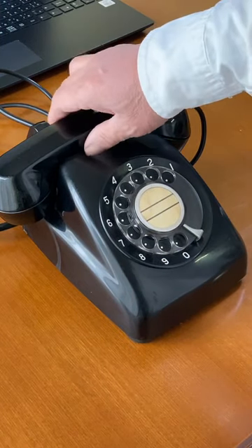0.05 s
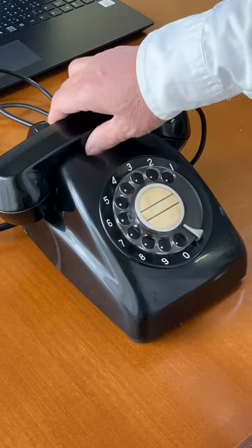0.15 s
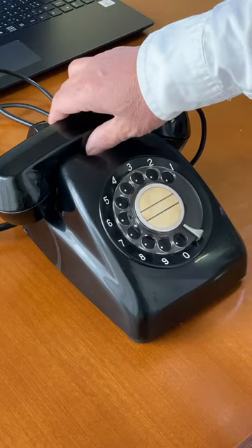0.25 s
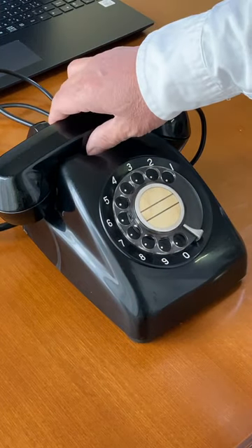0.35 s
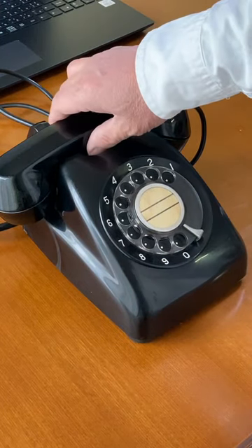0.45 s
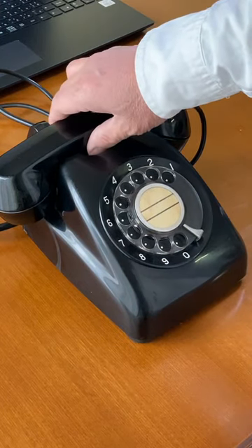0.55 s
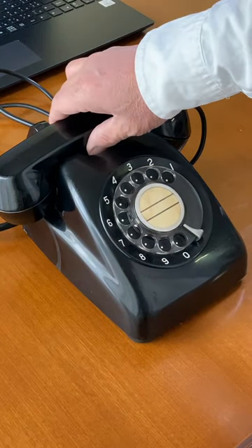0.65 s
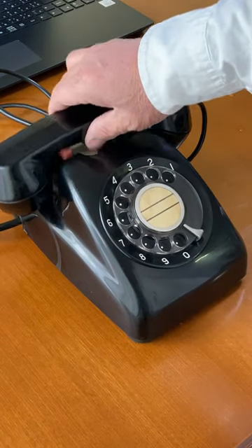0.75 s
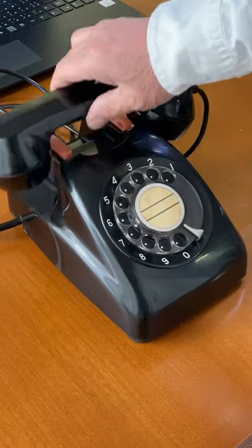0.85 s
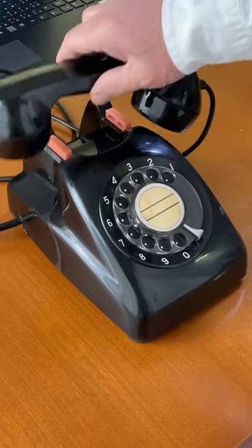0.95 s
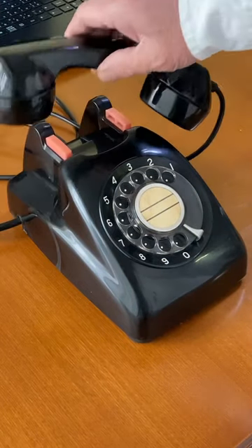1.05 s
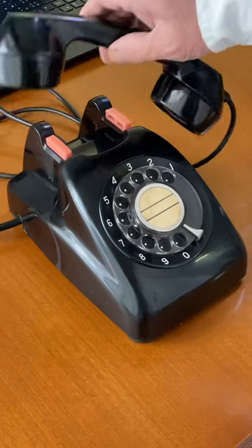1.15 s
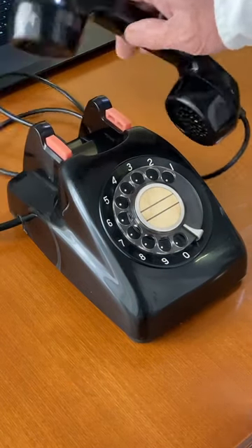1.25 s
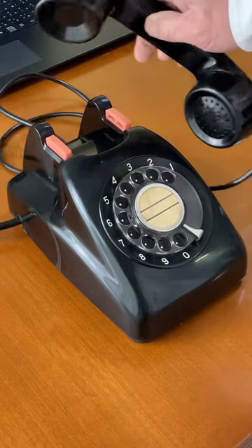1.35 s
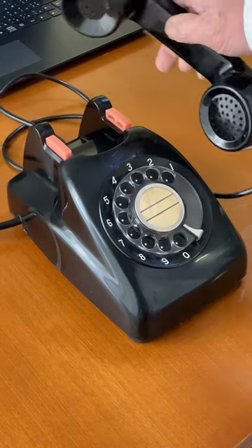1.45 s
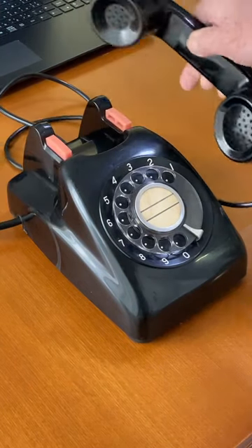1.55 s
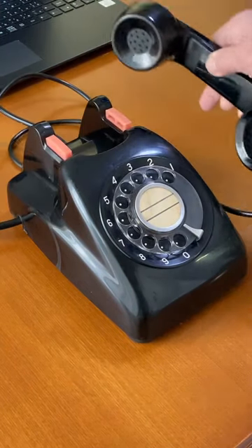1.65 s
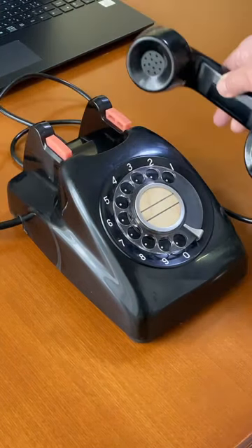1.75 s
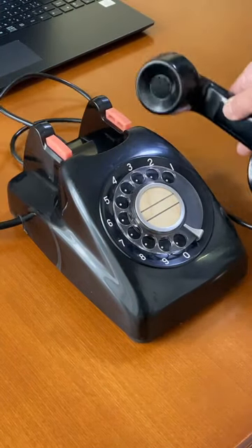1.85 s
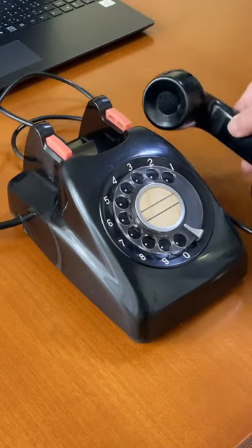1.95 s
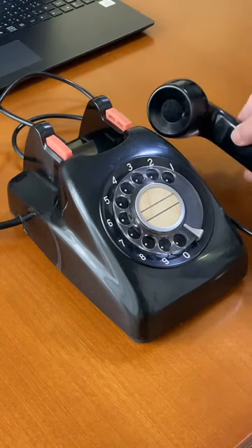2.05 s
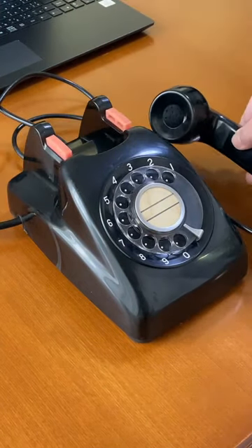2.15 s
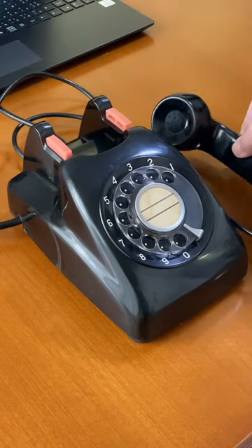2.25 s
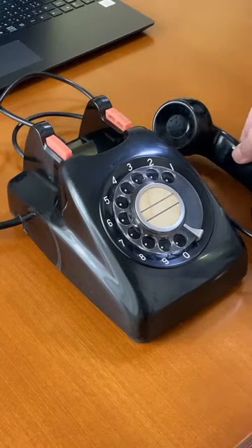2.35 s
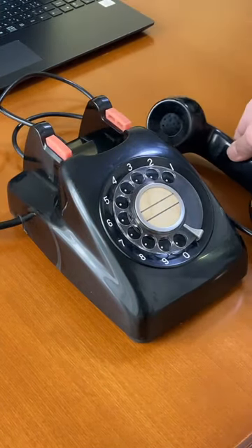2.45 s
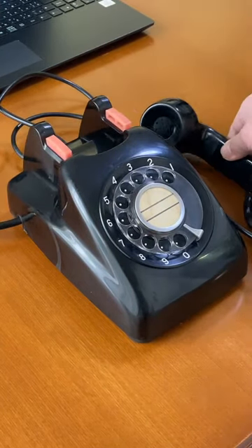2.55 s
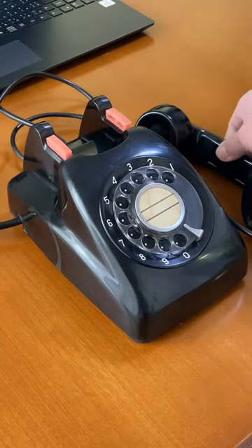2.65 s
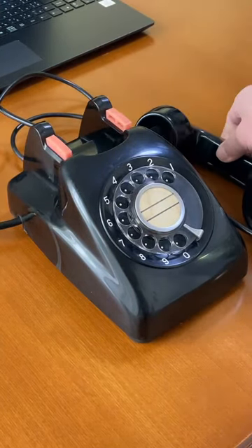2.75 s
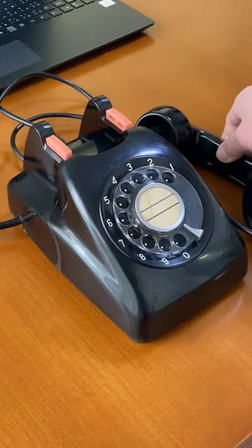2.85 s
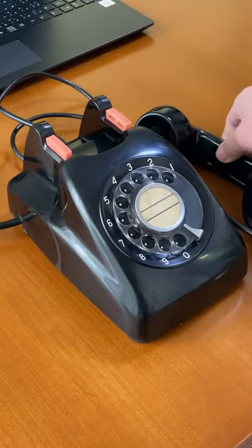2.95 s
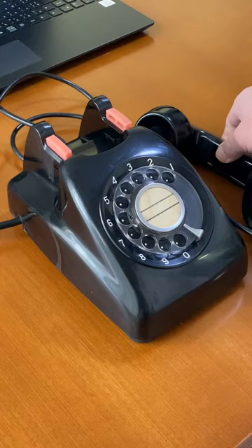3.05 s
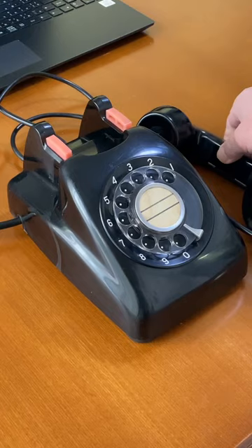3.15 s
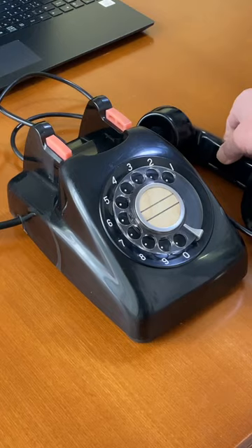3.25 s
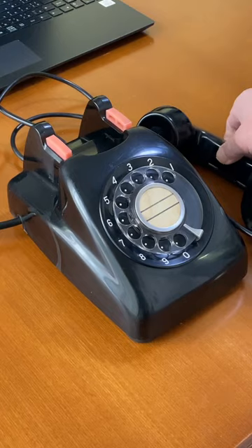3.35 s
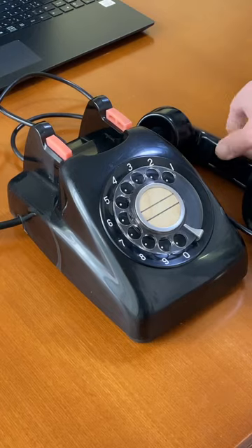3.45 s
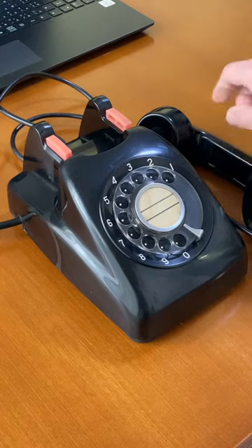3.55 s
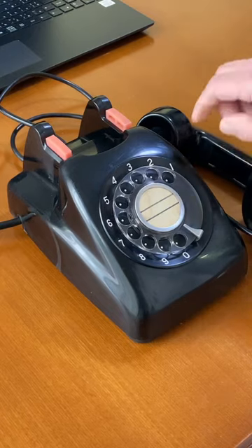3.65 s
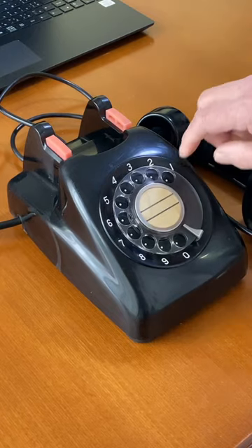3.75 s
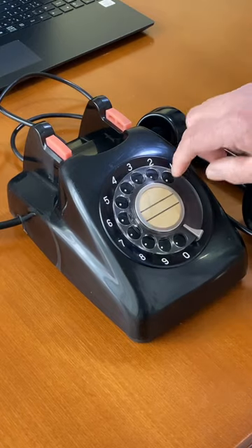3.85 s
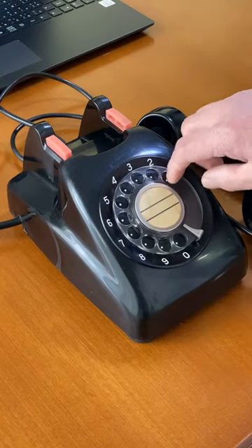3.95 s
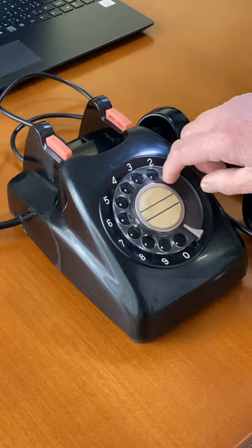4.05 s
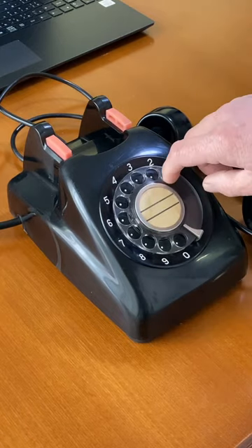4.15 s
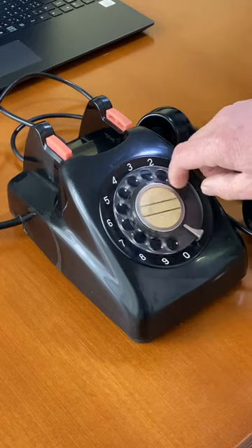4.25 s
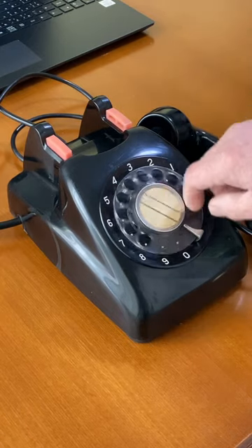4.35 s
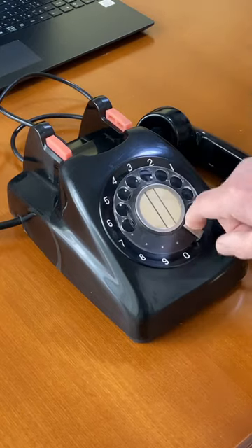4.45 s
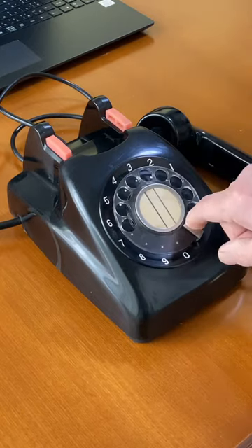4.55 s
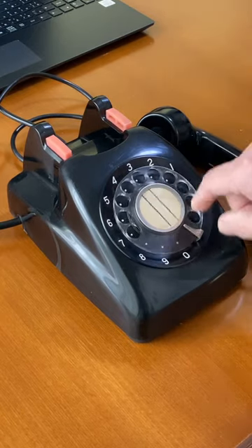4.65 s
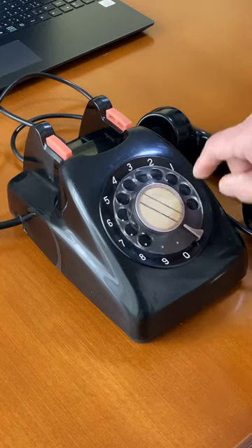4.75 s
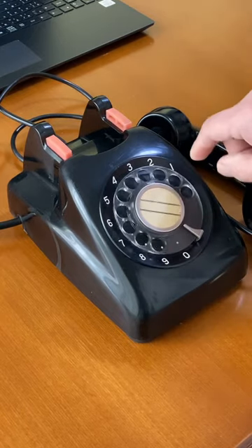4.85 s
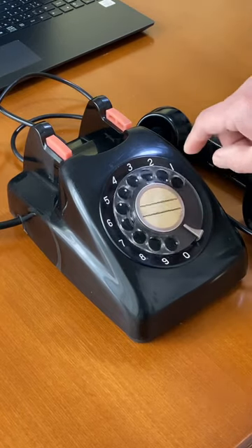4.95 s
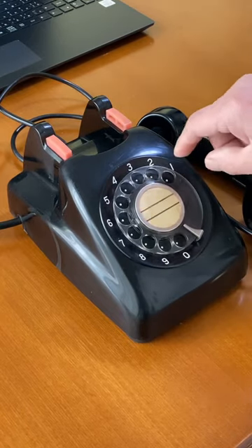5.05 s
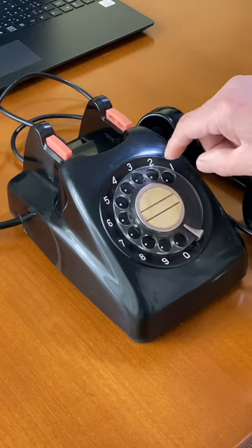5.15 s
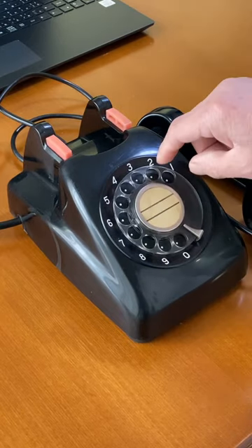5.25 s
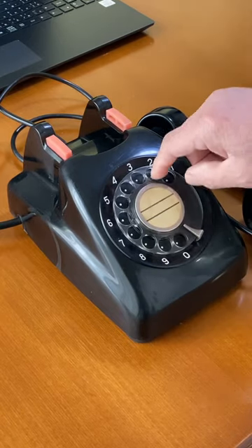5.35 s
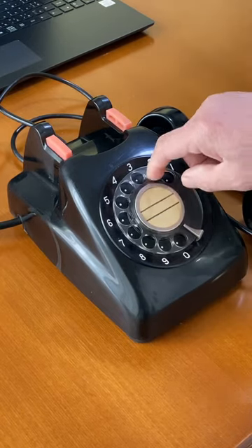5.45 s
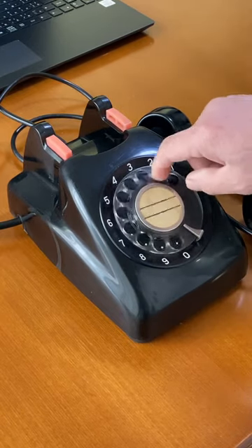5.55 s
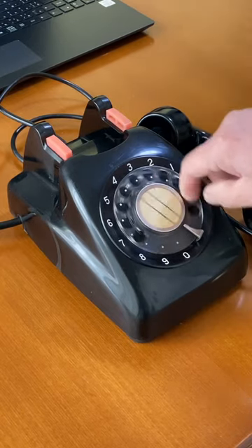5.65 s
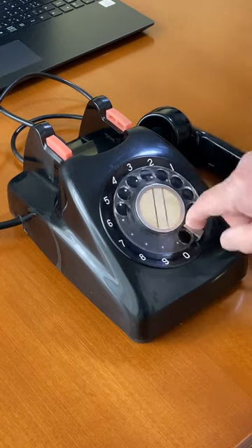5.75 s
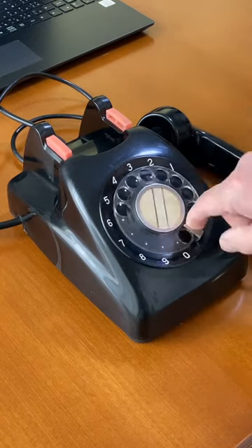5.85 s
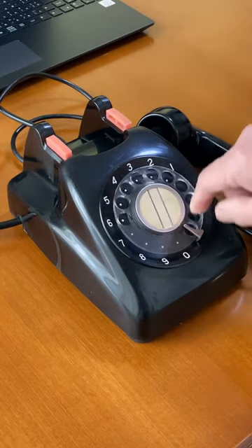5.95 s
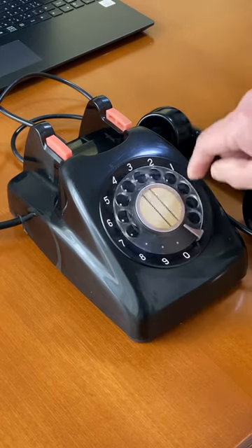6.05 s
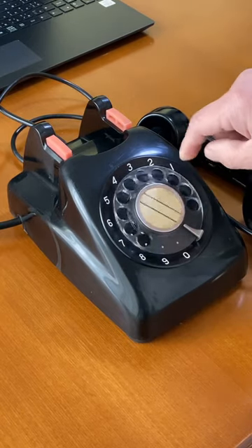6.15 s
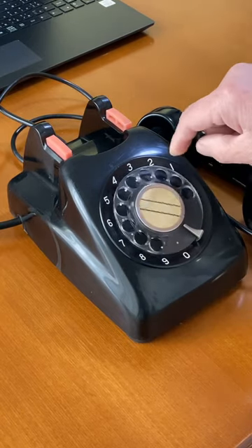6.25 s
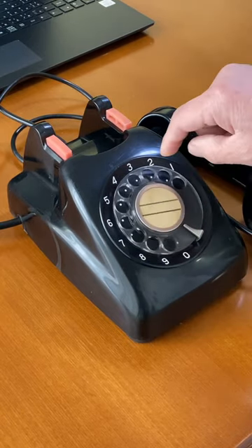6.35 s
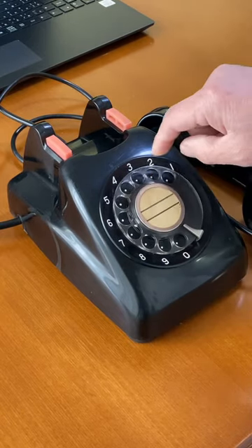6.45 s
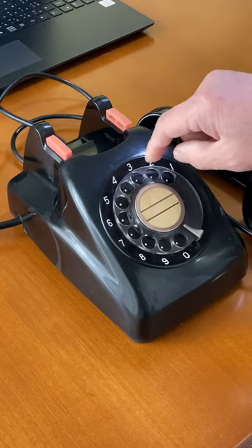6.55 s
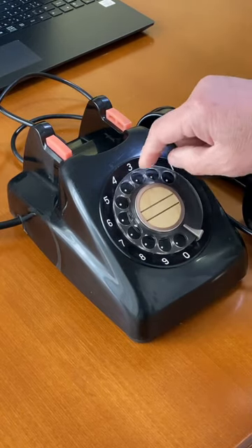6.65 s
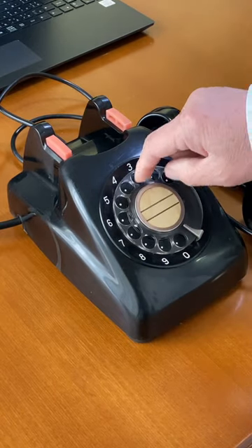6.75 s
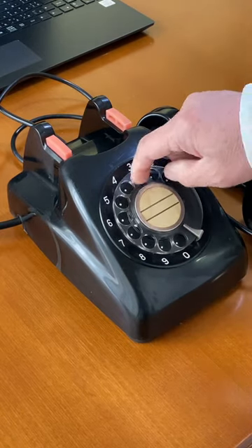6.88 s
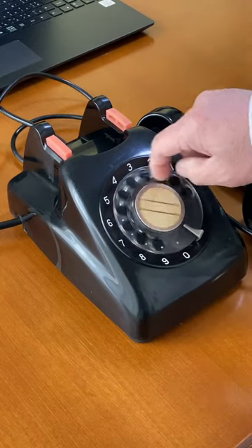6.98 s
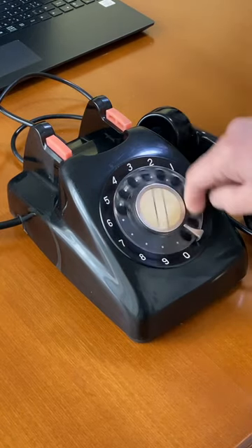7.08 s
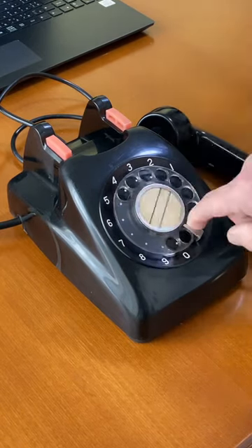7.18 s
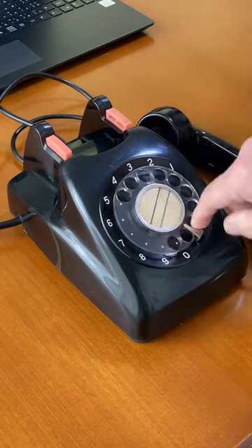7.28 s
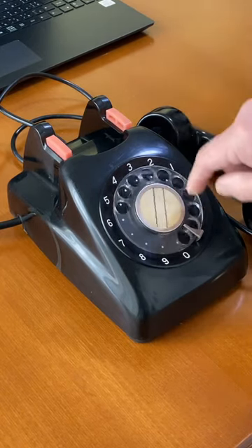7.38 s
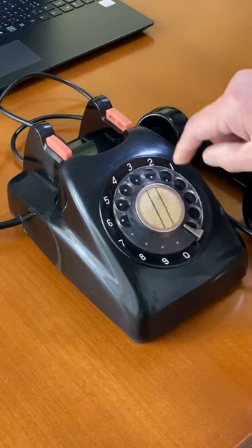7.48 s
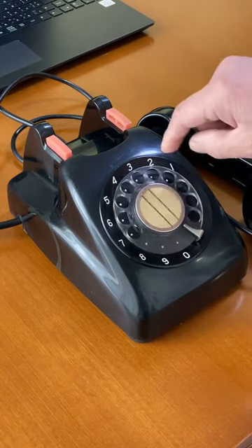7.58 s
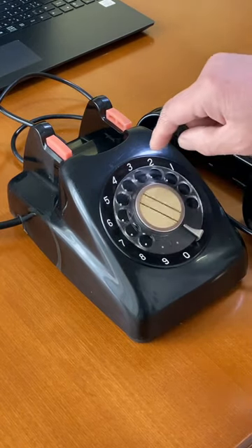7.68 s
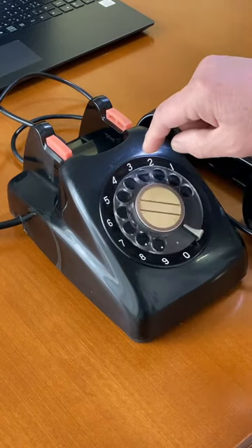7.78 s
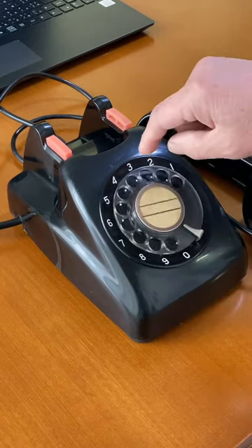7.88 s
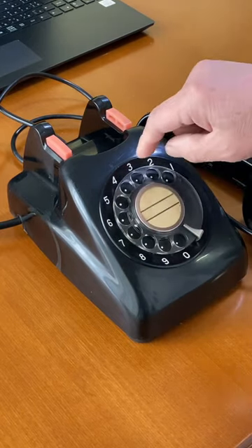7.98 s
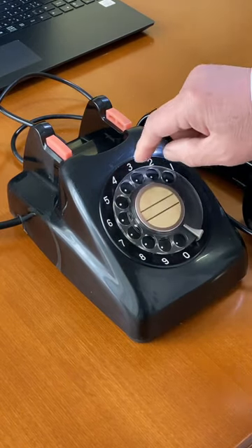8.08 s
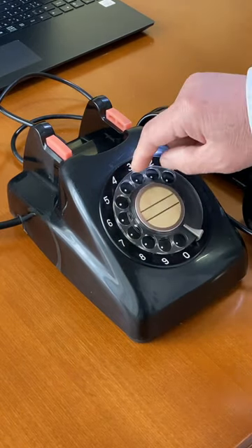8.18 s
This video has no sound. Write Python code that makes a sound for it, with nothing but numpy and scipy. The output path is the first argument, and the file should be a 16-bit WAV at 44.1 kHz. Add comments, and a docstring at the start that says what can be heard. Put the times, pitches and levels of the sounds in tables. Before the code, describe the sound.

In a quietly humming room, a telephone receiver clatters onto a desk, followed by three ratcheting dial turns with clicking, whirring returns and stop thuds.

```python
"""A small room with a humming induction motor: a plastic handset is lifted off a rotary telephone and laid
on a wooden desk, then three digits are dialled. Knocks are decaying modes of shell and desk; gears are
tooth impacts through housing resonances. Per digit the finger winds the ratchet, the governor whirrs the
wheel home past clicking contacts and a stop thuds. Heard through two closely spaced microphone ports."""
import sys
import numpy as np
from scipy import signal
from scipy.fft import rfft, irfft, next_fast_len
from scipy.io import wavfile
from scipy.ndimage import uniform_filter1d

SR = 44100
rng = np.random.default_rng(int(sys.argv[2]) if len(sys.argv) > 2 else 0)


def decibels_to_gain(level_db):
    """Convert a level in decibels to a linear amplitude gain (20 dB per decade)."""
    exponent = np.asarray(level_db, float) / 20
    return 10 ** exponent


def put_to_file(sound):
    """Save the sound as 16-bit audio at rate SR, in the file named by the first command-line argument."""
    columns = np.atleast_2d(sound).T  # one column per channel
    safe = np.clip(columns, -1, 1)
    whole_steps = np.round(safe * 32767)
    wavfile.write(sys.argv[1], SR, whole_steps.astype(np.int16))


N = 362502


def evened(x):
    """Scales to unit rms."""
    return x / np.sqrt(np.mean(x ** 2) + 1e-20)


def peaked(x):
    """Scales a short sound so that its loudest 4 ms have level 0 dB."""
    return x / np.sqrt(uniform_filter1d(x ** 2, 176).max())


def read(points, hz):
    """Interpolates a curve over log frequency."""
    point_hz, value = np.transpose(points)
    return np.interp(np.log(hz + 1), np.log(point_hz + 1), value)


def add(mix, start_s, sound):
    """Adds a sound in place, cut at the end of the mix."""
    part = mix[round(start_s * SR):][:len(sound)]
    part += sound[:len(part)]


def coloured(x, points):
    """Causal filter with the given spectrum: the phase follows from the log gain."""
    hz = abs(np.fft.fftfreq(4096, 1 / SR))
    log_gain = np.log(decibels_to_gain(np.maximum(read(points, hz), -90)))
    impulse = np.fft.ifft(np.exp(np.conj(signal.hilbert(log_gain)))).real[:2048]
    return signal.oaconvolve(x, impulse)[:len(x)]


def resonate(x, hz, width_hz):
    """One-pole complex resonance; wider means faster decay."""
    r = np.exp(-np.pi * width_hz / SR)
    return 2 * signal.lfilter([1 - r], [1, -r * np.exp(2j * np.pi * hz / SR)], x).real


def band(x, lo_hz, hi_hz):
    """Band-pass at unit rms."""
    sos = signal.butter(2, [lo_hz, hi_hz], "bandpass", fs=SR, output="sos")
    return evened(signal.sosfilt(sos, x))


def grit(per_s, spread_db):
    """Random micro-impacts of uneven size."""
    size = decibels_to_gain(spread_db * np.minimum(rng.exponential(1, N), 4))
    hits = rng.random(N) < per_s / SR
    return evened(size * hits * rng.choice([-1., 1.], N))


def ring(modes, rise_s, spread_db, near_hz, narrow_db):
    """One blow: the strike point favours modes near one pitch, the others fall off per octave."""
    hz, db, t60_s = np.transpose(modes)[:, :, None]
    t = np.arange(0, 1.2 * t60_s.max(), 1 / SR)
    weight, sign = rng.standard_normal((len(modes), 2)).T[:, :, None]
    struck_db = db + spread_db * weight - narrow_db * abs(np.log2(hz / near_hz))
    waves = np.sign(sign) * decibels_to_gain(struck_db - 60 * t / t60_s) * np.sin(2 * np.pi * hz * t)
    return peaked(waves.sum(0) * (1 - np.exp(-t / rise_s)))


# motor lines: (shaft multiple, mains multiple)
HUM_ORDERS = [(1, 0), (0, 1), (-1, 2), (2, 0), (0, 2), (3, 0), (1, 2), (0, 3), (0, 4), (0, 5)]
# their peak levels: (level [dB])
HUM_DB = [-33.5, -61, -68, -70, -56, -73, -77.5, -83, -72, -85]
SHAFT_HZ, MAINS_HZ, FIRST_DIP_S = 48.524, 49.98, .63
FAN_LINES_HZ, FAN_DB = [91.58, 311.47, 314.42], [-65, -82, -83]


def hum():
    """Shaft and mains lines stand against each other once per slip cycle, so the hum dips."""
    t = np.arange(N) / SR - FIRST_DIP_S
    out = np.zeros(N)
    for (shaft, mains), db in zip(HUM_ORDERS, HUM_DB):
        sign = 1 if mains == 0 else -1
        out += sign * decibels_to_gain(db) * np.sin(2 * np.pi * (shaft * SHAFT_HZ + mains * MAINS_HZ) * t)
    for hz, db in zip(FAN_LINES_HZ, FAN_DB):
        out += decibels_to_gain(db) * np.sin(2 * np.pi * (hz * t + rng.random()))
    return out


# room noise spectrum: (frequency [Hz], level [dB])
AIR = [(30, -10), (70, -0.5), (120, -3), (200, -9), (310, -14), (430, -28), (580, -27), (790, -31.5),
       (1200, -26.5), (4200, -33), (8000, -33.5), (14000, -32.5), (16300, -50), (17000, -79)]
# left-right correlation of the noise: (frequency [Hz], likeness [-1..1])
AIR_SAME = [(60, 1), (300, .95), (600, .2), (1000, -.35), (3200, -.55), (4300, -.1), (6000, -.7),
            (7500, .9), (9500, .55), (12500, -.3), (14500, .95)]
AIR_DB = -62.5


def air():
    """Room noise, alike in both ports in the bass; its level wavers, most in the bass."""
    frames, hz = N // 512 + 5, np.fft.rfftfreq(2048, 1 / SR)
    a, b, c, d, patches = rng.standard_normal((frames, 1025, 5)).T
    patches = evened(uniform_filter1d(uniform_filter1d(patches, 20, 0), 8, 1))
    same = np.clip(read(AIR_SAME, hz), -1, 1)[:, None]
    left = a + 1j * b
    z = np.array([left, same * left + np.sqrt(1 - same ** 2) * (c + 1j * d)])
    waver_db = 0.6 + 3.4 / (1 + (hz[:, None] / 600) ** 2)
    z *= decibels_to_gain(read(AIR, hz)[:, None] + waver_db * patches)
    return decibels_to_gain(AIR_DB) * evened(signal.istft(z, nperseg=2048, noverlap=1536)[1][:, :N])


# faint wavering tone in the fan noise: (frequency [Hz], width [Hz], level [dB])
WHINE = (578, 12, -91)


def whine():
    """Noise through a narrow resonance, applied twice."""
    hz, width_hz, db = WHINE
    once = resonate(rng.standard_normal(N), hz, width_hz)
    return decibels_to_gain(db) * evened(resonate(once, hz, width_hz))


# reverberation: (frequency [Hz], t60 [s])
ROOM = [(200, 0.54), (530, 0.33), (1390, 0.3), (3680, 0.26), (9700, 0.15)]


def room(x):
    """Sparse echoes, each band dying at its own speed; the bass reaches both ports alike."""
    taps = np.zeros((2, SR))
    at = np.arange(200, SR - 20, 20) + rng.integers(0, 20, (2, (SR - 201) // 20))
    np.put_along_axis(taps, at, rng.choice([-1., 1.], at.shape), 1)
    hz, t, z = signal.stft(taps, SR, nperseg=256)
    same = 1 / (1 + (hz[:, None] / 450) ** 2)
    z[1] = same * z[0] + np.sqrt(1 - same ** 2) * z[1]
    z *= hz[:, None] / (hz[:, None] + 300)  # furnishings soak up the low bass
    decay = decibels_to_gain(-60 * t / read(ROOM, hz)[:, None])
    tail = signal.istft(z * decay, SR, nperseg=256)[1]
    return signal.fftconvolve(x[None], tail / np.linalg.norm(tail[0]), axes=1)[:, :N]


# sound from the desk, at lead 1: (frequency [Hz], left leads by [rad])
PORT_PHASE = [(0, 0), (200, 0), (400, -.8), (750, -2), (1150, -1.7), (1700, -.3), (2300, -.4), (3200, -1.4),
              (4100, -3.0), (4700, -3.7), (6100, -2.5), (7600, -.3), (9300, 1.1), (11500, 2.6),
              (12900, 4.3), (14300, 6.2), (16500, 6.3)]
# (frequency [Hz], left over right [dB])
PORT_BALANCE = [(60, 5.5), (110, 5), (200, 3.5), (380, 4.5), (700, 1.5), (1290, -1.5), (2380, -0.5),
                (4400, 0.5), (8120, -0.5), (15000, 0)]


def ports(pair, lead):
    """Left and right differ by a phase lead and a level, both depending on frequency."""
    size = next_fast_len(N + SR)
    hz = np.fft.rfftfreq(size, 1 / SR)
    half = decibels_to_gain(read(PORT_BALANCE, hz) / 2) * np.exp(.5j * lead * read(PORT_PHASE, hz))
    return irfft(rfft(pair, size) * [half, 1 / half], size)[:, :N]


# fine friction spectrum: (frequency [Hz], level [dB])
BEARING = [(2650, -39), (4500, -9), (5640, -3), (8450, -1.5), (10300, -3), (11900, -35.5), (14600, -13),
           (16300, -20)]


def bearing(drive):
    """Fine impacts through the bright bearing resonances, unit rms."""
    return evened(coloured(drive, BEARING))


# strokes of hand, sleeve and cord: (loudest time [s], half length [s], level [dB],
#   dull part [dB rel.], bright part [dB rel.], scrape [dB rel.], scrape pitch [Hz])
RUBS = [(.59, .1, -76, 6, -10, 2, 1180), (0.702, .1, -73.5, 16.5, -26, 3, 2070),
        (0.848, 0.094, -64.5, -14, -2, -5, 1700), (1.071, 0.25, -65, -9.5, -14, 0, 1350),
        (1.309, .19, -59, -6.5, -8, -8, 1870), (1.769, 0.058, -82.5, -8, 11.5, 4.5, 2200),
        (2.215, .05, -78, 8.5, 9.5, -1.5, 1900), (2.398, 0.086, -72, 8.5, -16.5, -1.5, 1700),
        (3.355, 0.18, -76, 16, 1, 9, 4405), (3.62, .2, -93, 4, 14.5, -3, 2500),
        (5.258, 0.083, -77, 7.5, -15, -9, 1886), (5.41, .05, -73, 7, -17, -5, 1300),
        (6.78, 0.031, -64.5, 0, -21, 1, 1250)]
# a jolt leaves the parts shuffling: (time [s], level [dB], scrape pitch [Hz])
SHUFFLES = [(0.743, -39.5, 2200), (0.925, -65, 2000), (2.49, -37, 1700)]
STROKE_RISE = 0.78  # rise over half length: strokes start faster than they end
RUB_EDGE_DB, RUB_SHAPE, SCRAPE_SHARE = -29.5, 2.2, .33  # fall at the ends, squareness, width over pitch
SHUFFLE_RISE_S, SHUFFLE_FALL_S, SHUFFLE_DULL_DB, SHUFFLE_BRIGHT_DB = .016, 0.059, 0, -20.5


def rubs():
    """Surfaces catch and slip in dense grains; each stroke swells and fades around its scrape pitch."""
    drive, out = grit(3500, 4.1), np.zeros(N)
    wide = band(drive, 1200, 5200)
    dull = band(band(drive, 200, 520), 200, 750)
    bright = bearing(drive)
    strokes = [(s, STROKE_RISE * half_s, half_s, *rest) for s, half_s, *rest in RUBS]
    strokes += [(s, SHUFFLE_RISE_S, SHUFFLE_FALL_S, db, SHUFFLE_DULL_DB, SHUFFLE_BRIGHT_DB, -3, hz)
                for s, db, hz in SHUFFLES]
    for s, rise_s, fall_s, db, dull_db, bright_db, scrape_db, hz in strokes:
        span = slice(round((s - 2 * rise_s) * SR), round((s + 2 * fall_s) * SR))
        t = np.arange(span.start, span.stop) / SR - s
        swell_db = db + RUB_EDGE_DB * np.maximum(-t / rise_s, t / fall_s) ** RUB_SHAPE
        width_hz = SCRAPE_SHARE * hz
        scrape = evened(resonate(resonate(drive[span], hz, width_hz), hz, width_hz))
        parts = decibels_to_gain(scrape_db) * scrape + wide[span]
        parts += decibels_to_gain(dull_db) * dull[span] + decibels_to_gain(bright_db) * bright[span]
        out[span] += decibels_to_gain(swell_db) * parts
    return out


# the fingertip plugs a dial hole and the trapped air pops: (time [s], level [dB])
POPS = [(5.4222, -49), (6.786, -41)]
POP_FROM_HZ, POP_TO_HZ, POP_GLIDE_S, POP_T60_S = 2400, 520, .005, 0.036


def pops():
    """A short tone that slides down as the cavity closes."""
    out, t = np.zeros(N), np.arange(3000) / SR
    hz = POP_TO_HZ + (POP_FROM_HZ - POP_TO_HZ) * np.exp(-t / POP_GLIDE_S)
    tone = np.sin(2 * np.pi * np.cumsum(hz) / SR)
    pop = peaked(tone * (1 - np.exp(-t / 0.0026)) * decibels_to_gain(-60 * t / POP_T60_S))
    for s, db in POPS:
        add(out, s, decibels_to_gain(db) * pop)
    return out


# knocks of handset, cradle and finger: (time [s], shell ring [dB], desk thud [dB],
#   bright crack [dB], favoured desk pitch [Hz])
KNOCKS = [(0.343, -90, -55, -82, 213), (0.598, -63, -63, -91.5, 189), (0.685, -53, -39, -80.5, 394),
          (0.706, -45, -43.5, -71, 398), (0.741, -26, -31, -28, 410), (0.749, -28.5, -32, -48, 410),
          (0.925, -45.5, -55.5, -65, 400), (1.317, -45, -47.5, -67.5, 326), (1.334, -48.5, -47.5, -81, 358),
          (1.353, -48.5, -62, -77, 199), (1.947, -72, -72.5, -88.5, 192), (2.185, -64, -55, -69, 266),
          (2.328, -57.5, -51, -70, 261), (2.392, -56.5, -59.5, -81, 210), (2.494, -18.5, -9.5, -34.5, 270),
          (2.529, -22, -14.5, -45, 266), (2.558, -28, -25, -54, 217), (2.599, -12.5, -6.5, -26, 229.3),
          (2.637, -18.5, -12, -44, 619), (2.661, -24.5, -24, -60, 400), (4.21, -56, -62, -63, 230),
          (5.424, -44.5, -35, -71.5, 298), (5.522, -59, -51, -76, 240), (6.786, -47, -33, -67, 191),
          (6.792, -39, -28, -75, 420), (6.897, -56, -53.5, -71, 205), (7.243, -46, -57, -50.5, 250)]
# once per digit step the cam lifts the contact spring and lets the follower drop:
#   (lift time [s], contact snap [dB], drop time [s], knock [dB], drop snap [dB])
STEPS = [(4.645, -48, 4.684, -40, -36), (4.7674, -42, 4.804, -39.5, -62),
         (4.8853, -43.5, 4.926, -40.5, -35), (5.9224, -51, 5.97, -44, -49), (6.0492, -42, 6.092, -39, -37),
         (6.1744, -39.5, 6.211, -41.5, -53), (6.2976, -41, 6.341, -40.5, -36.5),
         (7.334, -50, 7.371, -42.5, -57), (7.446, -44, 7.49, -43.5, -46),
         (7.5697, -43.5, 7.613, -41, -44.5), (7.6894, -42, 7.735, -42, -48),
         (7.8151, -39, 7.854, -42.5, -57.5)]
# the wheel runs home: (governor catch time [s], stop time [s], level [dB])
RETURNS = [(4.634, 5.03, -45), (5.934, 6.447, -45), (7.341, 7.963, -44)]
# governor catch: (shell [dB], desk [dB], crack [dB])
CATCH_DB = (-41.5, -45.5, -67)
STOP_SHELL_DB, STOP_DESK_DB, STOP_CRACK_DB = -43, -33.5, -64
SOFT_HZ, HARD_HZ = 1056, 2200  # favoured shell pitch of a dull and of a sharp blow
DROP_DESK_DB, DROP_CRACK_DB = -7.5, -13  # relative to the knock
CAM_SHELL_HZ, CAM_DESK_HZ = 1240, 400


def blows():
    """All knocks as (s, shell dB, desk dB, crack dB, shell Hz, desk Hz)."""
    rows = []
    for s, shell_db, desk_db, crack_db, desk_hz in KNOCKS:
        sharpness = min(decibels_to_gain(crack_db - shell_db), 1)
        rows.append((s, shell_db, desk_db, crack_db, SOFT_HZ + (HARD_HZ - SOFT_HZ) * sharpness, desk_hz))
    for _, _, s, db, _ in STEPS:
        rows.append((s, db, db + DROP_DESK_DB, db + DROP_CRACK_DB, CAM_SHELL_HZ, CAM_DESK_HZ))
    for catch_s, stop_s, _ in RETURNS:
        rows.append((catch_s, *CATCH_DB, CAM_SHELL_HZ, CAM_DESK_HZ))
        rows.append((stop_s, STOP_SHELL_DB, STOP_DESK_DB, STOP_CRACK_DB, CAM_SHELL_HZ, CAM_DESK_HZ))
    return rows


# modes of the bare desk: (frequency [Hz], level [dB], t60 [s])
DESK = [(109, -9, 0.24), (135, -22, 0.28), (211, -2.5, 0.15), (264, -3.5, 0.11), (313.7, -7, 0.23),
        (358, -6.5, 0.11), (396.8, 0, 0.084), (439.2, -6.5, 0.2), (503.5, -5, 0.17), (561, -7, 0.11),
        (621, 5.5, 0.054), (775.6, -3, 0.11), (860, -11.5, 0.024)]
# modes of the plastic shell: (frequency [Hz], level [dB], t60 [s])
SHELL = [(949.6, 6, 0.018), (1012, -2.5, 0.047), (1210, 3.5, 0.017), (1410, -11.5, 0.012),
         (1650, 1.5, 0.021), (1850, -5, .03), (2160, -1, 0.027), (2340, 0.5, 0.025), (2516, 0.5, .03),
         (2806, -1, .025), (3075, 4, 0.0099), (3470, -5, 0.035)]
# rattle spectrum: (frequency [Hz], level [dB])
CRACK = [(400, -36), (800, 1.5), (2300, 0), (3400, -7.5), (4600, -10.5), (6500, -20), (9000, -18.5),
         (12000, -21.5), (15000, -25), (17000, -62.5)]
SCATTER_DB = 2.0  # how much mode strengths differ from blow to blow
BARE_DB = -28  # thuds above this level hit bare wood


def knocks():
    """The shell rings at once, the desk answers a moment later, a short crack on top.
    Row 0: blows damped by the feet of the telephone or a hand; row 1: the handset striking bare wood."""
    out, t = np.zeros((2, N)), np.arange(4000) / SR
    for s, shell_db, desk_db, crack_db, shell_hz, desk_hz in blows():
        bare = int(desk_db > BARE_DB)
        modes = np.multiply(DESK, [1, 1, 1 if bare else .55])  # damping shortens t60
        dull_db = np.clip(shell_db - crack_db - 15, 0, 26)
        rise_s = 0.00032 * decibels_to_gain(.7 * dull_db)  # dull blows build slowly and wake fewer modes
        rattle = coloured(rng.standard_normal(len(t)) * decibels_to_gain(-60 * t / 0.036), CRACK)
        rattle_db = min(shell_db - 5.0, crack_db + 18)  # soft blows hardly rattle
        shell = ring(SHELL, rise_s, SCATTER_DB, shell_hz, narrow_db=10 + 0.802 * dull_db)
        desk = ring(modes, 0.0022, SCATTER_DB, desk_hz, narrow_db=4 if bare else 9)
        add(out[bare], s, decibels_to_gain(shell_db) * shell)
        add(out[bare], s, decibels_to_gain(rattle_db) * peaked(rattle))
        add(out[bare], s + .0015, decibels_to_gain(desk_db) * desk)
        add(out[bare], s, decibels_to_gain(crack_db) * peaked(band(rattle, 4100, 14000)))
    return out


LAST_LIFT_S, LAST_SNAP_DB = 0.013, -40.5  # the final lift comes just before the stop


def lifts():
    """Every lift of the contact spring as (s, snap dB)."""
    return [row[:2] for row in STEPS] + [(stop_s - LAST_LIFT_S, LAST_SNAP_DB) for _, stop_s, _ in RETURNS]


# contact spring modes: (frequency [Hz], level [dB], t60 [s])
SPRING = [(2240, -1.5, 0.041), (1717, -5, 0.046), (2587, -6, 0.029)]
# the dial frame sings after each drop: (frequency [Hz], level [dB], t60 [s])
FRAME = [(1174, 0, 0.12), (1228, -4, 0.096), (2500, -12.5, 0.085)]
# switch blade modes: (frequency [Hz], level [dB], t60 [s])
BLADE = [(3680, -9, 0.038), (9800, -1, 0.022)]
# the blade pings as the winding wheel releases it: (time [s], level [dB])
PINGS = [(4.35, -54), (5.632, -43), (7.012, -42)]
# the finger winds the wheel: (start time [s], end time [s], final level [dB])
WINDS = [(4.207, 4.411, -47), (5.522, 5.728, -43), (6.898, 7.116, -42)]
FRAME_DB = -6.5  # relative to the knock
PLUCK_DB, FIRST_PLUCK_DB = -44.5, -13  # each lift; change for the weaker lift during spin-up
WIND_PLUCK_DB = -63  # the spring also twangs as winding starts


def springs():
    """Contact spring, dial frame and switch blade ring briefly as decaying modes."""
    out, plucks = np.zeros(N), []
    for s, _ in lifts():
        spinning_up = any(abs(s - row[0]) < .03 for row in RETURNS)
        plucks.append((s, PLUCK_DB + FIRST_PLUCK_DB * spinning_up))
    plucks += [(start_s, WIND_PLUCK_DB) for start_s, _, _ in WINDS]
    frame_rows = [(s, db + FRAME_DB) for _, _, s, db, _ in STEPS]
    for modes, rows in [(SPRING, plucks), (BLADE, PINGS), (FRAME, frame_rows)]:
        for s, db in rows:
            add(out, s, decibels_to_gain(db) * ring(modes, .002, 1, near_hz=1, narrow_db=0))
    return out


# ratchet and loose metal ticks while the dial winds and runs home:
#   (time [s], level [dB], top band [dB rel.])
TICKS = [(4.2094, -65, -8), (4.2383, -49, -30), (4.2907, -42.5, -5), (4.3393, -41, -7), (4.348, -38, -3),
         (4.378, -50, -5), (4.3939, -44.5, 0), (4.4219, -50, -16), (4.6678, -47, -25), (5.5418, -60, -14),
         (5.5989, -43.5, -5), (5.6294, -36.5, -2), (5.672, -42, -3.5), (5.707, -40, -3),
         (5.8158, -59.5, -28), (5.9221, -48, -30), (6.9765, -45, -8), (7.01, -35, -20), (7.0449, -43, -5),
         (7.077, -39, -9), (7.1093, -49.5, 5), (7.1327, -49.5, -23), (7.1806, -55, -26), (7.2385, -46, -22),
         (7.628, -48, -11)]
SNAP_LAG_S, SNAP_TOP_DB = .009, -10  # after the lift
DROP_LEAD_S, DROP_TOP_DB = .003, -21  # ahead of the knock
STOP_SNAP_DB, REBOUND_SNAP_DB, REBOUND_S = -32, -46.5, 0.028


def snaps():
    """Ratchet and loose ticks, contact, follower and stop snaps as (s, dB, top band relative dB)."""
    rows = TICKS + [(s + SNAP_LAG_S, db, SNAP_TOP_DB) for s, db in lifts()]
    rows += [(s - DROP_LEAD_S, db, DROP_TOP_DB) for _, _, s, _, db in STEPS]
    for _, stop_s, _ in RETURNS:
        rows.append((stop_s, STOP_SNAP_DB, DROP_TOP_DB))
        rows.append((stop_s + REBOUND_S, REBOUND_SNAP_DB, DROP_TOP_DB))
    return rows


def ticks():
    """Tiny metal parts snap: a noisy few milliseconds around a high resonance, some body knock below."""
    out, t = np.zeros(N), np.arange(1500) / SR
    for s, db, top_db in snaps():
        hz = 8850 * rng.uniform(0.85, 1.2)
        burst = rng.standard_normal(len(t)) * decibels_to_gain(-60 * t / 0.012) * (1 - np.exp(-t / 0.00069))
        snap = evened(resonate(burst, hz, 1140))
        snap += 0.53 * band(burst, 3300, 8600) + 0.65 * band(burst, 910, 7600)
        top = peaked(band(burst, 13700, 15000))
        add(out, s, decibels_to_gain(db) * (peaked(snap) + decibels_to_gain(top_db) * top))
    return out


LUMP_DB, LUMP_S, LUMP_STEP_S = 3, .018, .002


def lumps():
    """A random gain that changes every few hundredths of a second."""
    at = np.arange(0, N / SR + 1, LUMP_STEP_S)
    slow = evened(uniform_filter1d(rng.standard_normal(len(at)), round(LUMP_S / LUMP_STEP_S)))
    return np.interp(np.arange(N) / SR, at, decibels_to_gain(LUMP_DB * slow))


def levels(tables):
    """Joins (s, dB) curves into a gate with soft edges and a level, both at sample rate."""
    t, gate, db = np.arange(N) / SR, np.zeros(N), np.zeros(N)
    for rows in tables:
        s, row_db = np.transpose(rows)
        inside = (t >= s[0]) & (t < s[-1])
        gate[inside] = signal.windows.tukey(inside.sum(), .1)
        db[inside] = np.interp(t[inside], s, row_db)
    return gate, db


# spectrum between the housing resonances: (frequency [Hz], level [dB])
GEAR_FILL = [(90, -25), (200, -6), (420, 1), (700, -4), (1200, 4), (1900, -20), (2500, -17), (3600, -9.5),
             (4600, -7), (5400, -33), (9000, -76)]


def gears(tables, peaks, teeth_per_s, jitter, fill_db, top_db, hiss_db):
    """Uneven tooth impacts and rubbing grit excite the housing; uneven meshing sways each resonance."""
    gate, gears_db = levels(tables)
    sway = evened(uniform_filter1d(rng.standard_normal(N), 200))
    turns = np.cumsum(teeth_per_s / SR * (1 + jitter * sway))
    teeth = (np.diff(np.floor(turns), prepend=0) > 0) * decibels_to_gain(3.05 * rng.standard_normal(N))
    drive = 0.79 * evened(teeth) + 0.81 * grit(1000, 2.9)
    lump, housing = lumps(), np.zeros(N)
    for k, (hz, width_hz, db) in enumerate(peaks):
        own_lump = np.roll(lump, shift=9001 * k)  # each resonance swells and sinks on its own
        housing += (-1) ** k * decibels_to_gain(db) * own_lump * resonate(drive, hz, width_hz)
    body = evened(housing) + decibels_to_gain(fill_db) * evened(coloured(drive, GEAR_FILL))
    fine = 0.54 * evened(teeth) + grit(5000, 5.1)
    hiss = bearing(fine) + decibels_to_gain(top_db) * band(fine, 13600, 15900)
    return gate * decibels_to_gain(gears_db) * (evened(body) + decibels_to_gain(hiss_db) * hiss)


SILENT_DB = -33  # gear level where a turn begins and ends, under its full level
# housing resonances, winding: (frequency [Hz], width [Hz], level [dB])
WIND_PEAKS = [(212.5, 19, -4), (405.4, 64, 3.5), (847, 15, -11), (1207, 58, 0), (1420, 56, 1.5),
              (1540, 67, -6), (1700, 88, -3), (2490, 100, -22)]
WIND_START_DB, WIND_SWELL_S, WIND_FADE_S = -13.5, 0.12, 0.054


def winding():
    """The gears swell as the finger winds to the finger stop, then fall quiet."""
    curves = [[(a - .02, db + SILENT_DB), (a + 0.022, db + WIND_START_DB), (b - WIND_SWELL_S, db - 4.5),
               (b, db), (b + WIND_FADE_S, db + SILENT_DB)] for a, b, db in WINDS]
    return gears(curves, WIND_PEAKS, 190, .3, fill_db=-6.5, top_db=-8, hiss_db=-17.5)


# housing resonances, running home: (frequency [Hz], width [Hz], level [dB])
RETURN_PEAKS = [(213, 9.3, -0.5), (411, 62, 3), (498, 76, -6.5), (636.8, 11.6, 3), (775, 22, -5),
                (876, 14.4, 4.5), (1032, 9.8, 2.5), (1168, 49, 0.5), (1201, 17.7, 6), (1395, 73, -8.5),
                (1650, 160, -44), (2304, 115, -13), (2487, 27, -5.5), (2710, 200, -13), (3375, 120, -11.5),
                (3890, 130, -16)]
SPIN_UP_S, SAG_DB, SLAM_S, SLAM_DB, COAST_S = 0.084, -4, 0.031, 8, 0.053


def homing():
    """The gear level spins up, sags slowly as the spring unwinds and jolts at the stop."""
    curves = [[(a - SPIN_UP_S, db + SILENT_DB), (a - .008, db - 6.0), (a + 0.0031, db),
               (b - SLAM_S, db + SAG_DB), (b + 0.0044, db + SLAM_DB), (b + COAST_S, db + SILENT_DB)]
              for a, b, db in RETURNS]
    return gears(curves, RETURN_PEAKS, 168, .15, fill_db=-11, top_db=-21, hiss_db=-14.5)


def scene():
    """Direct sound with a port lead, plus echoes and room noise without one."""
    highpass = signal.butter(4, 70, "highpass", fs=SR, output="sos")
    damped, bare = signal.sosfilt(highpass, knocks())
    near = damped + rubs() + ticks() + springs() + pops() + winding() + homing()
    echoes = room(decibels_to_gain(-7.0) * near + decibels_to_gain(-5.5) * bare)  # the whole desk top radiates into the room
    return ports(np.array([near + bare] * 2), 0.85) + ports(echoes + hum() + air() + whine(), 0)


# the ports lose two bands of treble: (frequency [Hz], level [dB])
MIC = [(4800, -3), (5200, -9), (5800, -7.5), (6200, -3), (10700, -7.5), (11200, -16.5), (12300, -21),
       (13300, -2.5), (14200, -10), (15800, -4.5), (16400, -28.5)]


def port_losses(pair):
    """Filters both sides by the response of the ports."""
    return np.array([coloured(side, MIC) for side in pair])


def low_pass(x):
    """Removes everything above the highest recorded frequency."""
    return signal.sosfilt(signal.butter(12, 16650, fs=SR, output="sos"), x)


def record(dry):
    """The scene as picked up by the ports."""
    mix = port_losses(dry)
    return low_pass(mix)


dry = scene()
out = record(dry)
put_to_file(out)
```